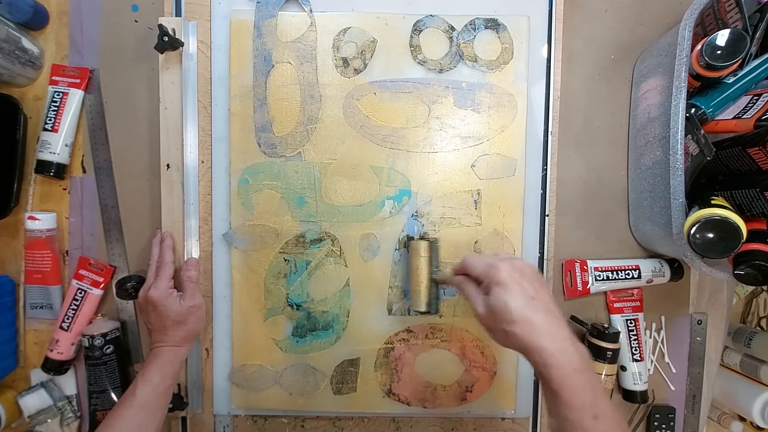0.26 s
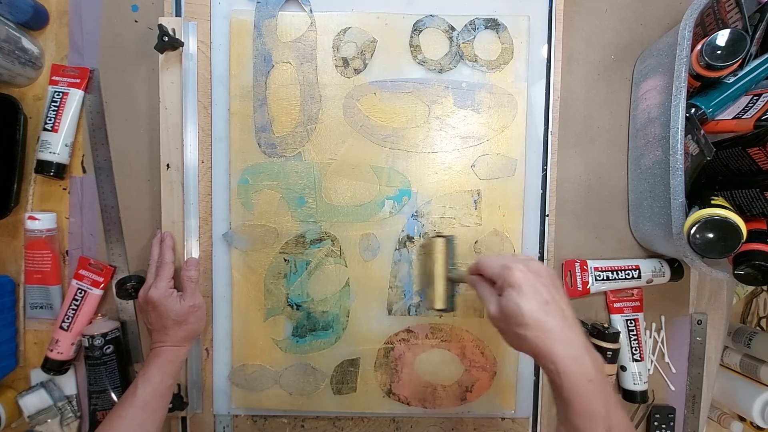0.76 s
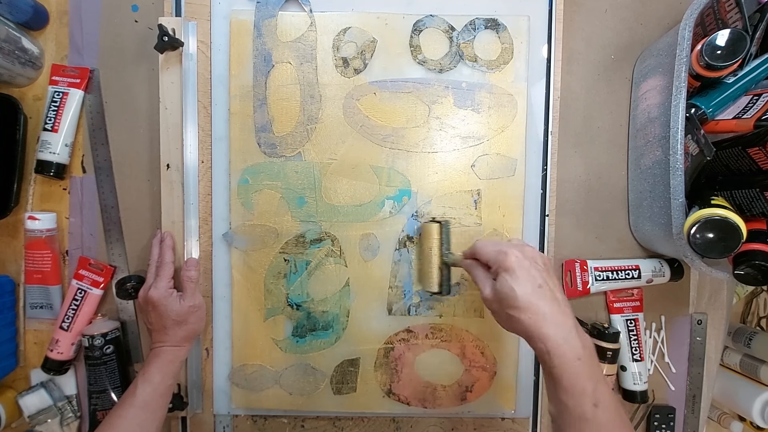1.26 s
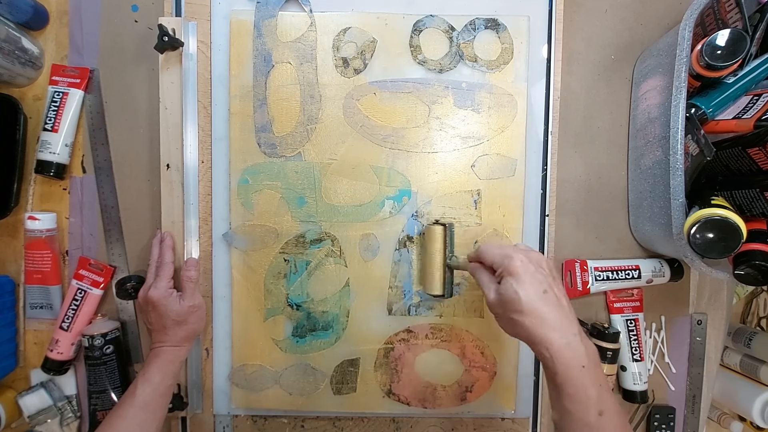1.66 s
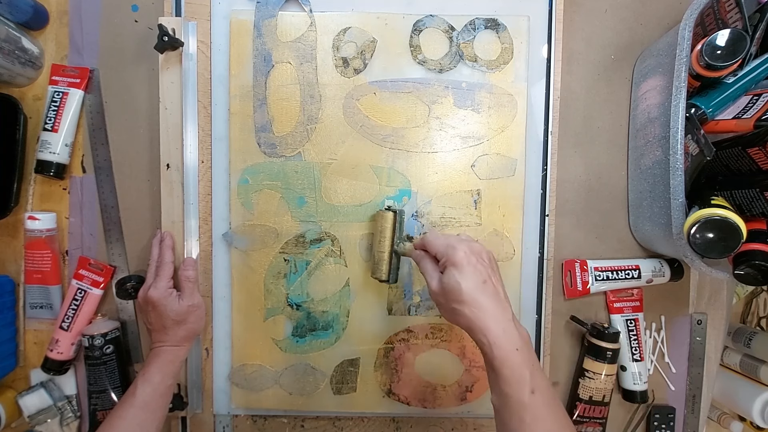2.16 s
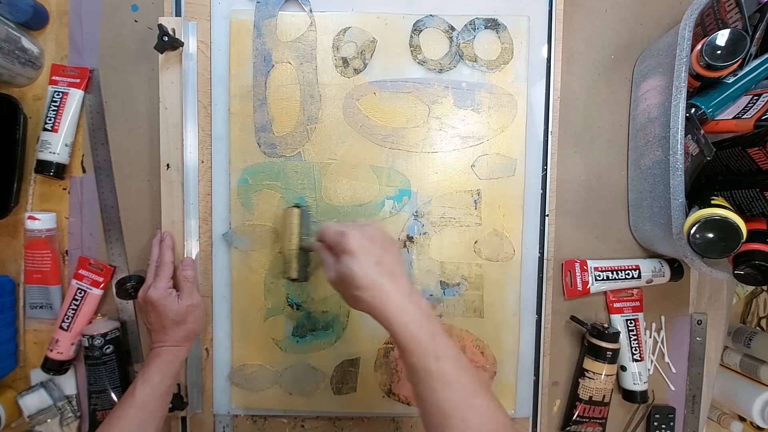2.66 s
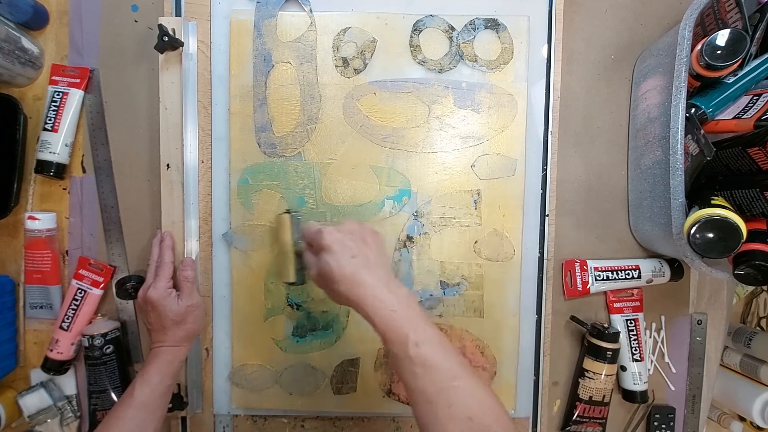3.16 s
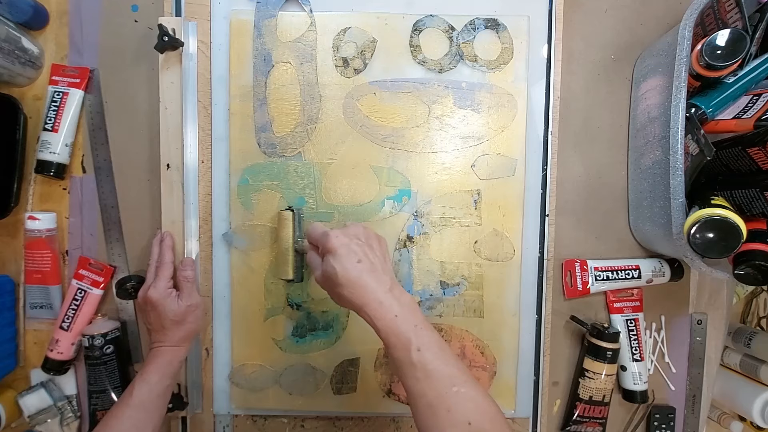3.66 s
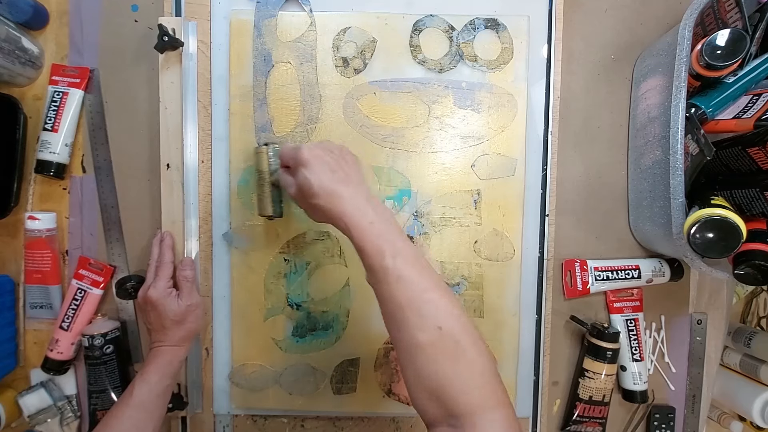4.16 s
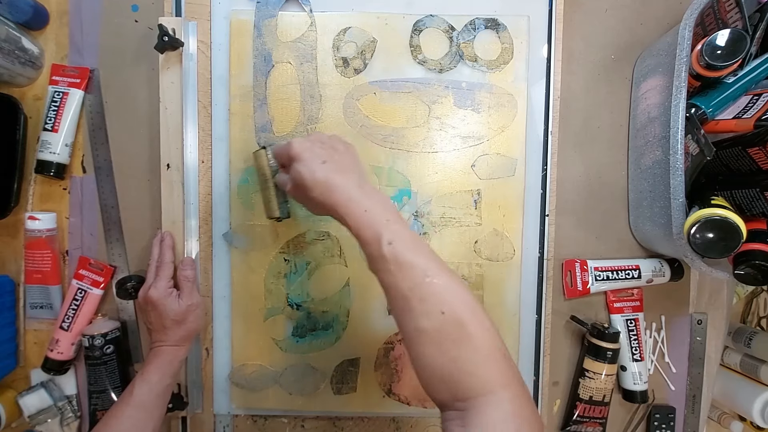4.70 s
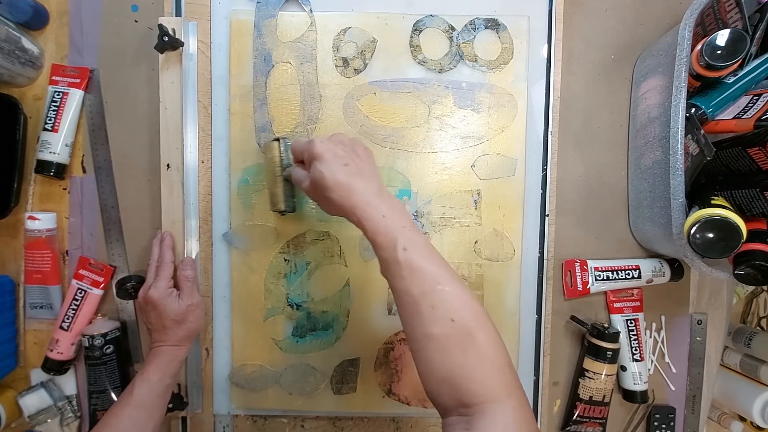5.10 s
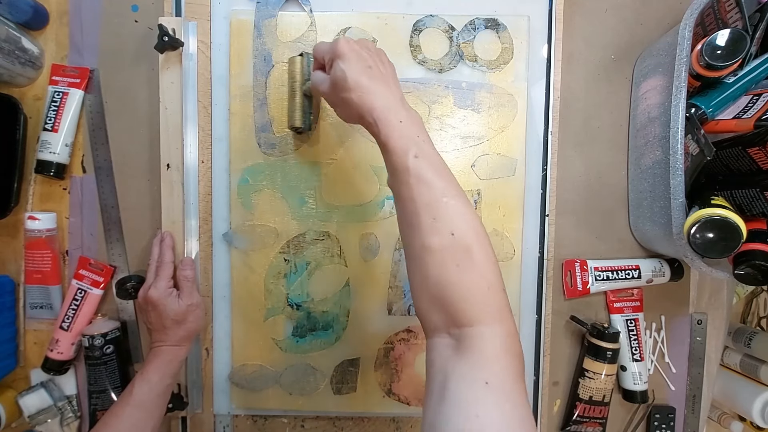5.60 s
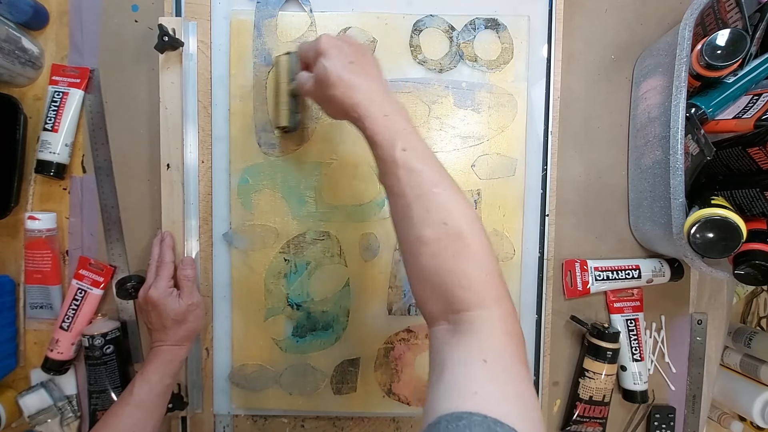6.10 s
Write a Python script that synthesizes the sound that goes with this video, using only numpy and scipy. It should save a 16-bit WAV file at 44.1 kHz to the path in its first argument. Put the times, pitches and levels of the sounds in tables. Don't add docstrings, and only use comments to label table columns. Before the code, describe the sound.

Close, mono sound of a hand roller going back and forth on a tacky painted plate in a small, lightly reverberant studio. Quiet rolling rumble and fine sticky hiss swell with every short pass over faint microphone hiss. From 0 to 0.5 seconds there are moderate rattling clicks and a soft low table thump near 0.5. Sharp, bright clacks of the loose roller in its metal frame strike at about 0.95, 1.15, 1.4, 1.6 and 1.8, the last followed by quick bounces, then another at 2.3. A softer cluster rattles at 2.8 to 2.95. From 3 to 5 seconds strokes are lighter, with sparse small ticks and modest clacks near 3.9 and 4.2. One loud dry clack lands at 5.27, a softer double clack with a dull thump at 5.62, then only faint rolling, sticky crackle and a muted bump near 5.9 until 6.4.

```python
import sys
import numpy as np
from scipy import signal
from scipy.io import wavfile

SR = 44100
rng = np.random.default_rng(int(sys.argv[2]) if len(sys.argv) > 2 else 0)


def master_out(mix):
    frames = np.transpose(np.atleast_2d(mix))
    ceiling = np.clip(frames, -1, 1)
    pcm = np.round(ceiling * 32767).astype(np.int16)
    wavfile.write(sys.argv[1], SR, pcm)


def volts_from_decibels(level):
    exponent = np.asarray(level, float) / 20
    return 10 ** exponent


N = 279594


def rms_one(x):
    return x / np.sqrt(np.mean(x ** 2) + 1e-20)


def at_hz(points, hz):
    table_hz, values = np.array(points).T
    return np.interp(np.log(hz), np.log(table_hz), values)


def drift(rate_hz):
    r = np.exp(-2 * np.pi * rate_hz * 40 / SR)
    white = rng.standard_normal(N // 40 + 2002)
    slow = signal.lfilter([1], [1, -2 * r, r * r], white)[2000:]
    return np.interp(np.arange(N) / 40, np.arange(len(slow)), rms_one(slow))


def resonate(x, hz, width_hz):
    r = np.exp(-np.pi * width_hz / SR)
    w = 2 * np.pi * hz / SR
    return signal.lfilter([0, np.sin(w)], [1, -2 * r * np.cos(w), r * r], x + 1e-18)


def bands():
    edges = 25 * 2 ** np.arange(0, 9.6, 0.5)
    return [(np.sqrt(a * b), signal.butter(2, [a, b], "band", fs=SR, output="sos"))
            for a, b in zip(edges, edges[1:])]


def grains(per_s, spread_db):
    sizes = volts_from_decibels(spread_db * np.minimum(rng.exponential(1, N), 5))
    signs = rng.choice([-1, 1], N)
    return rms_one(sizes * signs * (rng.random(N) < per_s / SR))


def coloured(sources, spectrum, patchy_db):
    out = np.zeros(N)
    together = drift(43.0)
    for k, (hz, sos) in enumerate(bands()):
        if spectrum[0][0] <= hz <= spectrum[-1][0]:
            flicker = drift(15.0)
            gain = volts_from_decibels(at_hz(spectrum, hz) + patchy_db * (0.6 * together + flicker))
            out += gain * signal.sosfilt(sos, sources[k % 2])
    return rms_one(out)


def effort():
    # full_speed_s, held_s, rumble_db, tackiness_db
    passes = [(0.0, 0.14, -53, -3.5), (0.329, 0.23, -54.5, -4), (0.69, 0.03, -54, -3.5),
              (0.83, 0.082, -57.5, -2.5), (0.93, 0.14, -51.5, -3), (1.14, 0.083, -50.5, 0.5),
              (1.4, 0.06, -51, -5.5), (1.56, 0.06, -51.5, 0), (1.791, 0.15, -54, -4),
              (2.02, 0.015, -61.5, -3), (2.098, 0.023, -55, -3.5), (2.28, 0.089, -53.5, -2.5),
              (2.43, 0.016, -50.5, -1.5), (2.608, 0.0067, -53, -2.5),
              (2.832, 0.14, -52, -5.5), (3.17, 0.013, -57.5, -5), (3.37, 0.025, -55.5, -1.5),
                  (3.59, 0.028, -58, -6.5), (3.89, 0.03, -52, -1), (4.01, 0.023, -56.5, -6),
                  (4.18, 0.066, -55, -1), (4.408, 0.0067, -53.5, -1), (4.622, 0.024, -56.5, -2),
                  (4.8, 0.03, -55.5, -1.5), (5.049, 0.013, -61, -5), (5.25, 0.095, -52.5, -5),
                  (5.61, 0.1, -54.5, -3.5), (5.8, 0.03, -61, -3.5), (5.93, 0.042, -57.5, -6),
                  (6.01, 0.017, -60.5, 2.5), (6.109, 0.0064, -57, 1.5), (6.21, 0.013, -60, -2),
                  (6.32, 0.03, -61.5, -2)]
    # rumble_db, rub_db, tear_db
    rest_db = (-74, -77.5, -73.5)
    speed_up_db_per_s, slow_down_db_per_s = 173.5, 132.5
    rub_db = -5.5
    tear_follows = 1.6
    t = np.arange(N) / SR
    power = np.ones((3, N)) * volts_from_decibels(np.array(rest_db)[:, None]) ** 2
    for s, held_s, level_db, tack_db in passes:
        before_s = np.maximum(s - t, 0)
        after_s = np.maximum(t - s - held_s, 0)
        lost_db = speed_up_db_per_s * before_s + slow_down_db_per_s * after_s
        near = lost_db < 60
        lost_db = lost_db[near]
        layers_db = np.array([-lost_db, rub_db - lost_db, tack_db - tear_follows * lost_db])
        power[:, near] += volts_from_decibels(level_db + layers_db) ** 2
    return np.sqrt(power)


def stroke():
    # frequency_hz, density_db (per Hz)
    rumble_spectrum = [(30, -29), (50, 2), (90, -11), (123, 0.5), (170, -6.5), (254, -8.5), (450, -7.5),
                       (750, -21), (1100, -18.5)]
    rub_spectrum = [(450, -11.5), (700, -5.5), (1300, -4), (2200, -7.5), (3400, -12), (5000, -7.5)]
    tear_spectrum = [(2060, -46.5), (3500, -11), (3730, -30), (5720, 2), (9910, -3.5), (15000, 3),
                     (15800, -12)]
    # frequency_hz, width_hz, level_db
    top_hz, width_hz, top_db = (119.3, 20.3, -17)
    rumble = coloured(rng.standard_normal((2, N)), rumble_spectrum, patchy_db=1.5)
    rumble += volts_from_decibels(top_db) * rms_one(resonate(rng.standard_normal(N), top_hz, width_hz))
    rub = coloured([grains(3000.0, spread_db=0.0) for _ in range(2)], rub_spectrum, patchy_db=0.5)
    tear = coloured([grains(8000.0, spread_db=-6.0) for _ in range(2)], tear_spectrum, patchy_db=3.0)
    microphone_hiss = volts_from_decibels(-72.0) * rng.standard_normal(N)
    return np.sum(effort() * [rumble, rub, tear], axis=0) + microphone_hiss


def bumps():
    # start_s, peak_db, pitch_hz
    presses = [(0.117, -65, 115.5), (0.428, -43, 70), (0.483, -36, 109), (0.941, -46, 134),
               (1.396, -38.5, 108), (1.579, -74, 128), (1.8, -43, 79), (2.291, -65, 120),
               (2.437, -45.5, 68), (2.829, -55, 130), (3.367, -56.5, 131), (3.888, -53, 123),
               (5.268, -62, 117), (5.621, -40.5, 118.2), (5.929, -47, 122)]
    out = np.zeros(N + SR)
    t = np.arange(SR // 4) / SR
    envelope = np.clip(t / 0.0056, 0, 1) * volts_from_decibels(-60 * t / 0.11)
    for s, peak_db, hz in presses:
        first = round(s * SR)
        out[first:first + len(t)] += volts_from_decibels(peak_db + 4.0) * np.sin(2 * np.pi * hz * t) * envelope
    return out[:N]


def studio(x):
    # frequency_hz, t60_s
    decay = [(200, 0.14), (530, 0.22), (1400, 0.24), (3700, 0.33), (9700, 0.31), (15000, 0.33)]
    first_echo_s, tail_gate_s = 0.0052, 0.15
    clumps_db = 2.5
    t = np.arange(SR // 2) / SR
    white = rng.standard_normal((2, len(t)))
    echoes = np.zeros(len(t))
    for k, (hz, sos) in enumerate(bands()):
        level_db = -60 * t / at_hz(decay, hz) + clumps_db * drift(40.0)[:len(t)]
        echoes += signal.sosfilt(sos, white[k % 2]) * volts_from_decibels(level_db)
    echoes *= np.clip(t / first_echo_s, 0, 1) ** 2
    echoes *= np.exp(-(t / tail_gate_s) ** 2)
    return signal.fftconvolve(x, echoes / np.sqrt(np.sum(echoes ** 2)))[:N]


def contacts():
    # start_s, peak_db, low_ring_db, treble_db, knock_db
    turn_clacks = [(0.139, -32, -8, -10, -24), (0.325, -28, 1.5, -3.5, -18), (0.407, -25.5, -1, -9, -9),
                   (0.6975, -37, 7, 2, -26), (0.812, -40.5, 2, -4.5, -13), (0.8984, -33.5, -1.5, -4.5, -15),
                   (0.9501, -14.5, -0.5, 2.5, -13), (1.1534, -15.5, -5, -2.5, -24),
                   (1.4104, -15.5, -8, -0.5, -14), (1.574, -19, -6.5, -3.5, -26),
                   (1.797, -13, -5.5, 1.5, -16.5), (2.022, -44, -2.5, -5.5, -4), (2.1051, -30, -5, -5, -8),
                   (2.284, -18, -0.5, -3.5, -19), (2.4414, -30.5, -7, -11, -10), (2.6037, -32, -1.5, -1, 1),
                   (2.831, -29, -5, -4, -18), (3.3711, -44.5, 2.5, -4, 7), (3.8947, -27.5, 0, 0.5, -30),
                   (4.011, -33, 1, 0, -22.5), (4.1872, -27, -4.5, -1, -25), (4.4111, -42.5, 0, -7, -4),
                   (5.2743, -15, -8.5, -1.5, -17.5), (5.6187, -31.5, -3, 0.5, -1)]
    further_contacts = [(0.4122, -31, -11, 2, -10), (0.4394, -22, -23.5, -2, -27), (0.4903, -42.5, 6, -8, 5),
                        (0.7142, -40, -14, -3, -26), (1.1328, -34.5, -6, -20, -1), (1.8063, -24.5, -4, 3, -17),
                        (1.8547, -21.5, -4, -1.5, -23), (2.321, -25.5, -3, 5.5, -26),
                        (2.4513, -39.5, 6, 1.5, -9), (2.827, -38.5, 5, -6, -4.5), (2.841, -35.5, -1, 0, -0.5),
                        (2.871, -31, -8.5, -4, -4), (2.924, -37.5, -2.5, 0, -5), (2.9477, -53, 6, -6, 18),
                        (4.2408, -36, -7, -0.5, -21), (5.2585, -35, 0.5, 0.5, -10), (5.623, -31, -7, 0, 6),
                        (5.6381, -31.5, -1.5, -2, -28)]
    # start_s, peak_db, low_ring_db, treble_db
    slack_ticks = [(0.0843, -49.5, 13, -7.5), (0.2424, -58, 10, -10), (0.5227, -73, 1, 7),
                   (0.7607, -40.5, -23, -23.5), (0.8689, -60, 14, 4), (1.3139, -46.5, -3, -5.5),
                   (1.3776, -44, -3, -13), (2.0742, -45.5, 2, -9), (2.5293, -51, -3, -10),
                   (2.5617, -50, 6, -13.5), (2.7394, -65, 4, -9), (2.796, -55.5, 10, -5),
                   (3.1677, -55, 9, -12), (3.5283, -67, 17.5, -4), (3.5724, -71, 18.5, 8),
                   (3.591, -61, 8, -8), (3.6187, -58.5, 10, -12), (3.87, -43, -1, 1.5),
                   (3.878, -40.5, -2, -2), (4.0044, -42.5, 3.5, 2), (4.4294, -68, -1, -3),
                   (4.6159, -62.5, 11.5, 9.5), (4.782, -56, 2, -2), (5.2203, -52, 0.5, -13),
                   (5.7146, -54.5, 9, 3), (5.7767, -70.5, 5, 22.5), (5.9984, -69, -8, 18),
                   (6.1924, -79, 14, 24), (6.2042, -71, 4, 22), (6.322, -61, -10.5, 11.5)]
    tick_knock_db = -8.5
    rows = [tuple(r) for r in turn_clacks] + [tuple(r) for r in further_contacts]
    rows += [(*r, tick_knock_db) for r in slack_ticks]
    return np.array(sorted(rows))


def struck(modes, level_db, chatter_s, scatter_db):
    events = contacts()
    at = np.round(events[:, :1] * SR)
    late = rng.random((len(at), 24))
    stretch = 1 + np.clip(0.02 * (-21.5 - events[:, 1:2]), 0, 1)
    where = np.minimum(at + late * stretch * chatter_s * SR, N - 1).astype(int)
    swell = np.clip(late / 0.11, 0, 1) * volts_from_decibels(-13.0 * late)
    near, blow = np.zeros((2, N))
    shared = rng.standard_normal(late.shape) ** 3
    for k, (hz, width_hz, mode_db) in enumerate(modes):
        sign = (-1) ** k
        force = swell * (shared * sign + 1.516 * rng.standard_normal(late.shape))
        phasors = force * np.exp(2j * np.pi * hz * where / SR)
        force /= np.abs(np.sum(phasors, axis=1, keepdims=True)) + 1
        strength = volts_from_decibels(level_db + mode_db + scatter_db * rng.standard_normal(len(at)))
        clicks = np.zeros((2, N))
        np.add.at(clicks[0], where, force * strength[:, None])
        clicks[1, at[:, 0].astype(int)] = strength * sign
        rings = resonate(clicks, hz, width_hz)
        near += rings[0]
        blow += rings[1]
    return near, blow


def clacks():
    # frequency_hz, width_hz, level_db
    low_modes = [(1077, 150, -13.5), (1581, 218, -5), (1903, 330, 1.5), (2193, 264, 1)]
    mid_modes = [(2593, 310, 1.5), (3036, 270, 0.5), (3488, 270, 1), (3963, 290, -2.5), (5108, 370, -8.5)]
    high_modes = [(5990, 890, 2), (7006, 610, 0.5), (8273, 1200, 5.5), (9930, 240, -12.5), (10600, 450, -9),
                  (12500, 2500, 4), (14800, 1300, -5.5)]
    plate_modes = [(307.6, 120, 0), (507, 83, -2.5), (881, 160, 6)]
    yoke_modes = [(1835, 48, -3.5), (2650, 45, -7), (3383, 53, -2), (7240, 86, -2.5), (7970, 64, -5)]
    _, peak_db, low_db, treble_db, knock_db = contacts().T
    low = struck(low_modes, peak_db + low_db - 1.0, chatter_s=0.005, scatter_db=3.0)
    mid = struck(mid_modes, peak_db - 5.5, chatter_s=0.004, scatter_db=3.0)
    high = struck(high_modes, peak_db + treble_db + 0.7, chatter_s=0.0055, scatter_db=1.72)
    knock = struck(plate_modes, peak_db + knock_db - 10.5, chatter_s=0.005, scatter_db=4.5)
    yoke = struck(yoke_modes, peak_db - 19.0, chatter_s=0.003, scatter_db=4.0)
    near = low[0] + mid[0] + volts_from_decibels(-2.0) * high[0] + yoke[0] + knock[0]
    blow = low[1] + mid[1] + high[1] + volts_from_decibels(-6.0) * yoke[1] + volts_from_decibels(-5.5) * knock[1]
    studio_db = -5.5
    return volts_from_decibels(0.5) * near + volts_from_decibels(studio_db + 6) * studio(blow)


def scene():
    return (stroke() + bumps() + clacks())[None]


def band_limit(x):
    return signal.sosfilt(signal.butter(12, 17000, fs=SR, output="sos"), x)


def record(dry):
    bass_cut = signal.butter(3, 55.0, "high", fs=SR, output="sos")
    top_cut = signal.cheby2(14, 34, 16100, fs=SR, output="sos")
    mix = signal.sosfilt(top_cut, signal.sosfilt(bass_cut, dry))
    return band_limit(mix)


dry = scene()
out = record(dry)
master_out(out)
```